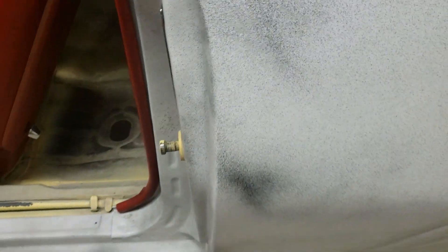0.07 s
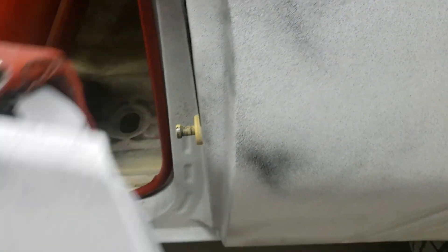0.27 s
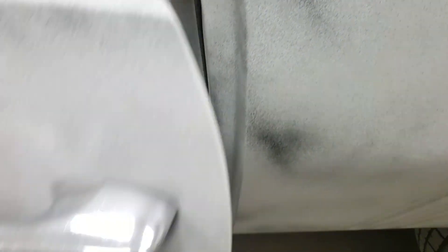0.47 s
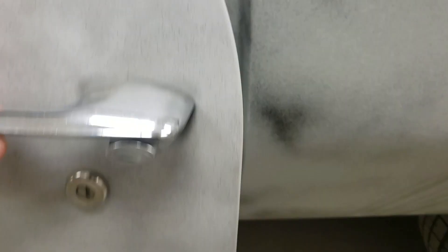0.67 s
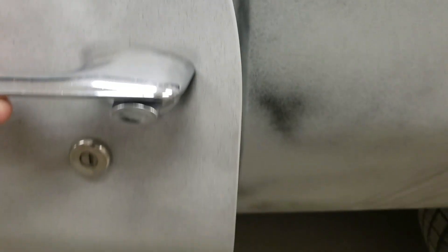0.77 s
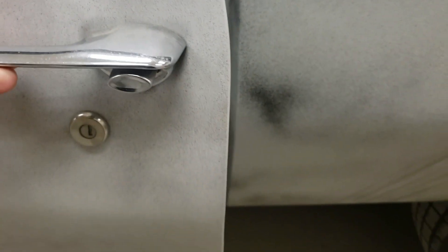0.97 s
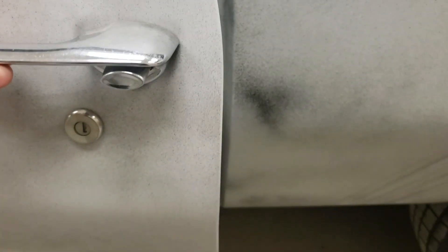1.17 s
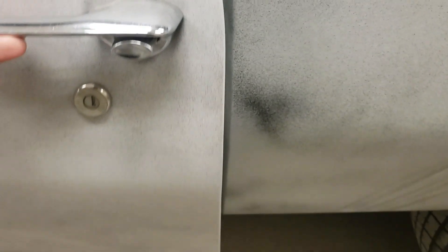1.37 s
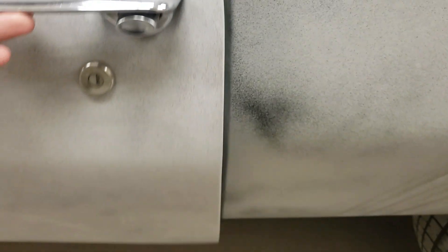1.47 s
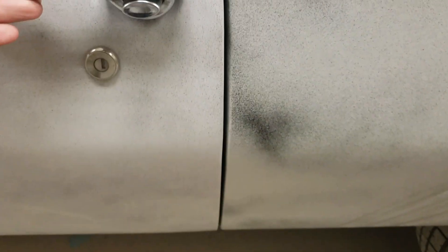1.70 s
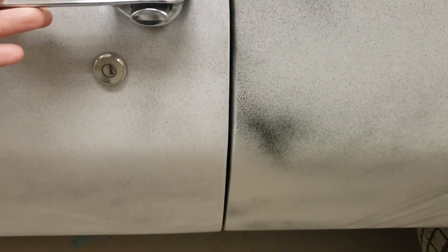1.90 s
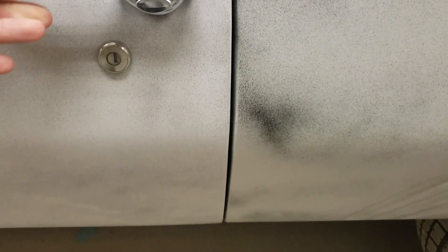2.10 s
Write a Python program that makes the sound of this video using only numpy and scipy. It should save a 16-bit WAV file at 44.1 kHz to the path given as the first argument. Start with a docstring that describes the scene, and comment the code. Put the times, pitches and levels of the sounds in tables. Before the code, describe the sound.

A heavy old car door slams shut after a faint knock, then rattles briefly.

```python
"""Car door slammed in a workshop

A sleeve or shoe slides with a soft swish; a heavy old car door knocks lightly, then slams.
The latch catches in two stages; the impacts excite the modes of the steel skin and the cabin booms.
A loose part inside the door rattles three times while the reverberation dies away over a low hum.
Distinct modes are damped sinusoids; densely packed modes are decaying bands of noise."""
import sys
import numpy as np
from scipy import signal
from scipy.fft import rfft, irfft, next_fast_len
from scipy.io import wavfile

SR = 44100
rng = np.random.default_rng(int(sys.argv[2]) if len(sys.argv) > 2 else 0)


def log_audio(samples):
    """Write samples as a 16-bit WAV file to the path given in sys.argv[1]."""
    # one column per channel
    frames = np.atleast_2d(samples).T
    # limit to full scale, then quantise
    limited = np.clip(frames, -1, 1)
    pcm = np.round(limited * 32767).astype(np.int16)
    wavfile.write(sys.argv[1], SR, pcm)


N = 94682
T = np.arange(N) / SR
N_FFT = next_fast_len(N)
FREQS = np.maximum(np.fft.rfftfreq(N_FFT, 1 / SR), 1)


def undb(db):
    """Amplitude ratio of a level in decibels."""
    return 10 ** (np.asarray(db) / 20)


def at(table, hz):
    """Interpolation on a logarithmic frequency axis."""
    f, value = np.array(table, float).T
    return np.interp(np.log(hz), np.log(f), value)


def hits_of(table, column):
    """The (t/s, level/dB) pairs of one column of an event table."""
    return [(row[0], row[column]) for row in table]


def decay(start, attack_s, t60):
    """Damping: after its rise, the amplitude falls 60 dB in t60 seconds."""
    age = np.maximum(T - start, 0)
    return -np.expm1(-age / attack_s) * np.exp(-np.log(1000) * age / t60)


def hit_power(hits, attack_s, t60):
    """Incoherent addition: the powers of (t/s, level/dB) impacts sum."""
    return sum((undb(db) * decay(start, attack_s, t60)) ** 2 for start, db in hits)


# likeness of the two channels: f/Hz, coherence (0-1)
COHERENCE = [(100, 0.93), (250, 0.86), (500, 0.72), (1000, 0.05), (2000, 0), (5000, .02)]
def noise(spectrum):
    """Partial coherence: stereo noise of unit rms, alike in the bass and unrelated in the treble."""
    mid, side = rfft(rng.standard_normal((2, N_FFT)))
    coherence = at(COHERENCE, FREQS)
    pair = mid * np.sqrt(1 + coherence) + np.array([[1], [-1]]) * side * np.sqrt(1 - coherence)
    shaped = irfft(pair * undb(at(spectrum, FREQS)))[:, :N]
    return shaped / np.std(shaped)


def resonances(spread_db=2.68, width_hz=22):
    """Modal overlap: the steel's many small resonances ripple the spectrum, less so in the bass."""
    grid = np.arange(0, SR / 2, width_hz)
    peaks = np.interp(FREQS, grid, rng.standard_normal(len(grid)))
    gain = undb(spread_db * peaks * np.clip(FREQS / 600, 0, 1))
    return gain / np.sqrt(np.mean(gain ** 2))


# reverberation time of the workshop: f/Hz, T60/s
ROOM_T60 = [(60, 1.6), (170, 1.26), (400, 0.82), (900, 0.68), (2000, 0.56), (4000, 0.65), (8000, 0.4),
            (14000, 0.23)]
def burst(hits, spectrum, attack_s, t60, room_db):
    """Reverberation: impacts ring as noise, and the room stores their energy, octave by octave."""
    direct = hit_power(hits, attack_s, t60)
    reflected = np.interp(T - 0.0031, T, direct)  # delay of the first wall reflections
    carrier = rfft(noise(spectrum), N_FFT) * resonances()
    octave = np.clip(np.log2(FREQS / 55), 0, 8)
    out = 0
    for k in range(9):
        band = irfft(carrier * np.maximum(1 - abs(octave - k), 0))[:, :N]
        retained = np.exp(-np.log(1e6) / (SR * at(ROOM_T60, 55 * 2 ** k)))
        tail = signal.lfilter([np.log(1e6) / (SR * t60)], [1, -retained], reflected)
        out = out + band * np.sqrt(direct + tail * undb(room_db) ** 2)
    return out


def ring(hits, modes, attack_s):
    """Free vibration: struck modes decay, the higher ones out of phase between the channels."""
    out = 0
    for hz, db, t60 in modes:
        envelope = undb(db) * np.sqrt(hit_power(hits, attack_s, t60))
        offset = np.arccos(at(COHERENCE, hz)) * rng.choice([-1, 1]) / 2
        phase = 2 * np.pi * (hz * T + rng.random())
        out = out + envelope * np.sin(phase + np.array([[offset], [-offset]]))
    return out


# spectrum of the workshop's background: f/Hz, relative level/dB
HUM_SPECTRUM = [(25, 1), (101, -2.5), (289, -28), (495, -28), (1020, -35), (1750, -37.5), (3530, -41),
                (4870, -47), (6210, -30), (7300, -38.5), (8810, -54), (11800, -36.5), (15500, -43)]
def hum():
    """Stationary noise: energy gathered in the bass is heard as a low hum."""
    return noise(HUM_SPECTRUM) * undb(-58)


# handling noises: t/s, level/dB
RUSTLES = [(.035, -61.5), (.48, -67.5), (.81, -73)]
# their spectrum: f/Hz, relative level/dB
RUSTLE_SPECTRUM = [(2000, -9.5), (6000, 2.5), (9000, -9), (12500, 4), (16000, -5)]
def rustles():
    """Friction noise: handling gives faint, slowly fading treble."""
    return burst(RUSTLES, RUSTLE_SPECTRUM, attack_s=0.011, t60=0.87, room_db=-10)


# bumps of the door's body: t/s, level/dB
BUMPS = [(.235, -46.5), (1.262, -51), (1.35, -53.5)]
# their spectrum: f/Hz, relative level/dB
BUMP_SPECTRUM = [(60, -23), (130, -4), (250, 0), (420, -9), (900, -8), (3000, -50)]
def bumps():
    """Damped impacts: the door's body answers dully, mostly at low frequencies."""
    return burst(BUMPS, BUMP_SPECTRUM, attack_s=0.0022, t60=0.16, room_db=-10.5)


# spectrum of the rub: f/Hz, relative level/dB
SWISH_SPECTRUM = [(70, -25), (110, -7.5), (228, -5), (576, -14), (1230, -9), (2690, -6.5), (8060, -14),
                  (15500, -13.5)]
def swish(start_s=0.092, rise_s=0.067, release_s=0.23, fall_s=0.082):
    """Sliding friction: a broadband rub of a sleeve or shoe lingers in the room."""
    swell = np.clip((T - start_s) / rise_s, 0, 1) * np.exp(-np.maximum(T - release_s, 0) / fall_s)
    lead_in = undb(-20) * np.clip(1 - T / release_s, 0, 1)
    tail_spectrum = [(150, -4), (1100, 2), (2800, -0.5), (6500, -1), (9000, -35)]
    tail = burst([(0.2, -50)], tail_spectrum, attack_s=0.009, t60=0.41, room_db=3)
    return noise(SWISH_SPECTRUM) * undb(-45.5) * (swell + lead_in) + tail


# spectra of the touch, knock and click: f/Hz, relative level/dB
TOUCH_SPECTRUM = [(300, -6.5), (490, 2), (850, -9.5), (1400, -39)]
KNOCK_SPECTRUM = [(100, -22), (340, -14.5), (490, 1), (650, -8), (820, 0.5), (1050, -6.5), (1300, -8.5),
                  (2000, -22.5), (5000, -55)]
CLICK_SPECTRUM = [(600, -33), (1400, -2.5), (2500, -3), (4500, -12), (6500, -5.5), (8500, -19.5),
                  (11000, -9.5), (13000, -0.5), (16000, -15.5)]
# modes of the knocked door: f/Hz, relative level/dB, T60/s
KNOCK_MODES = [(247, -16, 1.5), (461, 0.5, 0.4), (512, 4.5, .3), (830, 0.5, 0.33), (877, 0, 0.26),
               (1114, -7, 0.41), (1387, -6, 0.37), (2400, -4, 0.24)]
def knock(touch_s=1.054, knock_s=1.2115):
    """Weak modal excitation: a dull touch, then a light, hollow knock with a small click."""
    touch_hit, knock_hit = [(touch_s, -58)], [(knock_s, -45.5)]
    touch = burst(touch_hit, TOUCH_SPECTRUM, attack_s=0.022, t60=0.2, room_db=-2)
    touch += ring(touch_hit, [(508, 2.8, 0.23)], attack_s=0.014)
    hollow = burst(knock_hit, KNOCK_SPECTRUM, attack_s=0.0074, t60=0.46, room_db=-4.5)
    hollow += ring(knock_hit, KNOCK_MODES, attack_s=0.0093) * undb(-2.5)
    click = burst([(knock_s, -44)], CLICK_SPECTRUM, attack_s=0.0028, t60=0.12, room_db=-6)
    return touch + hollow + click


# bounces of the loose part: t/s, clack level/dB, tick level/dB
BOUNCES = [(1.816, -28, -35.5), (1.9875, -36, -47.5), (2.1075, -42.5, -55)]
# spectra of its clack and tick: f/Hz, relative level/dB
CLACK_SPECTRUM = [(200, -25), (550, 4.5), (900, -12.5), (1400, -4), (1700, 1), (2050, 1), (2500, -14),
                  (3800, -17.5), (7000, -28), (9000, -40)]
TICK_SPECTRUM = [(3000, -33), (9500, -21), (11000, -8), (12400, 1.5), (13600, -8), (14400, -13),
                 (16000, -18)]
def rattle():
    """Inelastic collisions: a loose part in the door bounces, sooner and weaker each time."""
    clack = burst(hits_of(BOUNCES, 1), CLACK_SPECTRUM, attack_s=0.0045, t60=0.16, room_db=-11.5)
    tick = burst(hits_of(BOUNCES, 2), TICK_SPECTRUM, attack_s=0.0018, t60=0.1, room_db=-11)
    return clack + tick


# thuds as the door seats and settles: t/s, thud level/dB, mode drive level/dB
THUDS = [(1.666, -26, -2), (1.716, -26, -12), (1.797, -48, -3.5)]
# their spectrum: f/Hz, relative level/dB
THUD_SPECTRUM = [(28, -38), (44, -9), (70, -2), (120, -13.5), (165, -3.5), (250, -10), (500, -15),
                 (1500, -50)]
# low modes of the cabin and body: f/Hz, level/dB, T60/s, rise time/s
CABIN_MODES = [(48.36, -17, 0.75, 0.073), (72.2, -21.5, 0.85, 0.011), (84.34, -27, 0.71, 0.014),
               (155.8, -21, 0.23, 0.01), (172.35, -27, .8, .013), (200.8, -33.5, 0.99, 0.014),
               (248.4, -29.5, 0.7, 0.033)]
def cabin(push_s=1.6825, push_width_s=0.0016):
    """Cavity and body resonance: the seating door pushes a pulse of air and sets low modes booming."""
    boom = sum(undb(db + drive_db) * decay(start, rise_s, t60) * np.sin(2 * np.pi * hz * (T - start))
               for start, _, drive_db in THUDS for hz, db, t60, rise_s in CABIN_MODES)
    u = (T - push_s) / push_width_s
    push = -u * np.exp((1 - u ** 2) / 2) * undb(-17)  # compression, then rarefaction
    thuds = burst(hits_of(THUDS, 1), THUD_SPECTRUM, attack_s=0.0051, t60=0.18, room_db=-7)
    return boom + push + thuds


# blows of the slam: t/s, skin level/dB, latch level/dB, relative ping level/dB
BLOWS = [(1.5752, -21, -23, -39), (1.5835, -22.5, -32, -35.5), (1.6285, -22, -18, -16),
         (1.641, -19, -23, -22), (1.6575, -23, -15.5, -17.5), (1.667, -20, -26, -35)]
# the latch's two catches on the striker: t/s, level/dB
CATCHES = [(1.5758, -15), (1.6583, -11)]
# spectra of the door skin, latch clank, latch crack and steel ping: f/Hz, relative level/dB
SKIN_SPECTRUM = [(25, -44), (60, -4.5), (130, -8), (280, -6), (450, -1), (620, -1), (760, 0), (1000, -5.5),
                 (1350, -3.5), (1900, -12.5), (3000, -24), (8000, -32.5)]
CLANK_SPECTRUM = [(300, -18.5), (800, -17), (1280, -2.5), (1700, 7.5), (2200, -14), (5000, -33.5),
                  (9000, -50)]
CRACK_SPECTRUM = [(300, -20), (1000, 2.5), (1900, 1), (2900, 2.5), (4200, -0.5), (7100, -1), (7900, -11),
                  (10500, -15.5), (16000, -27)]
PING_SPECTRUM = [(3000, -48), (9500, -13), (11200, -5.5), (12500, 1), (13500, 3), (14300, -1), (16000, -6)]
# modes of the door skin and the latch steel: f/Hz, relative level/dB, T60/s
SKIN_MODES = [(355, -11, 1), (414.7, -6.5, 0.97), (462.5, -3, 0.64), (492.3, -6.5, 0.55),
              (567.7, -4.5, 0.85), (701, -2.5, 0.68), (751, -14, 0.42), (872.6, -1, 0.5), (1084, -10, 0.42),
              (1320, -3, 0.29), (1335, -1, 0.24)]
LATCH_MODES = [(1897, -5, 0.45), (2056, -3, .45), (2540, -1, 0.4), (2920, 8.5, 0.12), (3210, -16, 0.21),
               (4900, -12, 0.55)]
# hollow notes of different spots on the panel: t/s, f/Hz, level/dB, T60/s
PANEL_NOTES = [(1.575, 1268, -19.5, 0.12), (1.634, 440.5, -20, 0.097), (1.637, 749, -16.5, 0.051)]
def slam(seal_s=1.559):
    """Impulsive excitation: the seal brushes the frame, then quick blows ring the skin and latch."""
    skin, latch, steel = (hits_of(BLOWS, column) for column in (1, 2, 3))
    seal = burst([(seal_s, -42.5)], SKIN_SPECTRUM, attack_s=0.006, t60=0.4, room_db=-13)
    clang = burst(skin, SKIN_SPECTRUM, attack_s=0.00039, t60=0.078, room_db=-8.5)
    clang += ring(skin, SKIN_MODES, attack_s=0.0022) * undb(-15)
    notes = sum(ring([(start, db)], [(hz, 0, t60)], attack_s=0.0015)
                for start, hz, db, t60 in PANEL_NOTES)
    clank = burst(CATCHES, CLANK_SPECTRUM, attack_s=0.00037, t60=0.035, room_db=-20.5)
    crack = burst(latch, CRACK_SPECTRUM, attack_s=0.00099, t60=0.12, room_db=-10.5)
    crack += ring(latch, LATCH_MODES, attack_s=0.00073) * undb(-19)
    ping = burst(steel, PING_SPECTRUM, attack_s=0.00045, t60=0.13, room_db=-6) * undb(-2.5)
    snap = burst(steel, PING_SPECTRUM, attack_s=0.00027, t60=0.017, room_db=-40) * undb(8)
    return seal + clang + notes + clank + crack + ping + snap


def scene():
    """Superposition: the brief sounds add to the workshop's hum."""
    return rustles() + bumps() + slam() + cabin() + rattle() + knock() + swish() + hum()


# balance of the microphones: f/Hz, left minus right level/dB
BALANCE = [(400, 0), (1200, -2), (2400, -0.5), (4400, -4.5), (9000, -4.5), (12500, -7), (16000, -16)]
def record(dry, low_cut_hz=24.4, high_cut_hz=15800):
    """Frequency response: the right microphone takes more treble; deepest bass and top are cut."""
    tilt = undb(np.array([[1], [-1]]) * at(BALANCE, FREQS) / 2)
    tilt /= np.sqrt(np.mean(tilt ** 2, axis=0))  # constant total power
    low_cut = 1 / (1 + (low_cut_hz / FREQS) ** 6)
    balanced = irfft(rfft(dry, N_FFT) * tilt * low_cut)[:, :N]
    return signal.sosfilt(signal.ellip(10, 0.2, 80, high_cut_hz, fs=SR, output="sos"), balanced)


dry = scene()
out = record(dry)
log_audio(out)
```